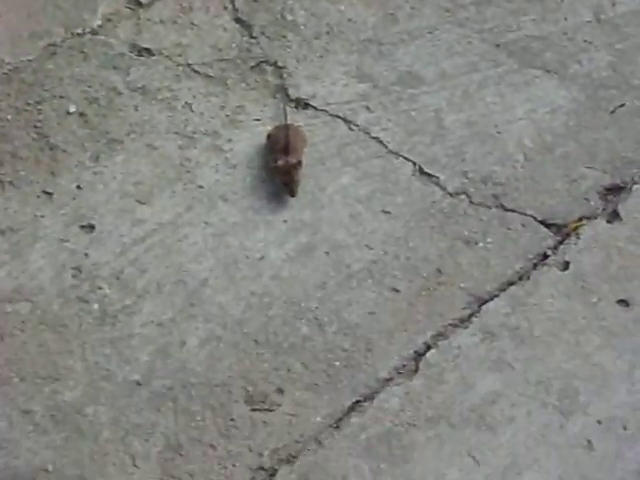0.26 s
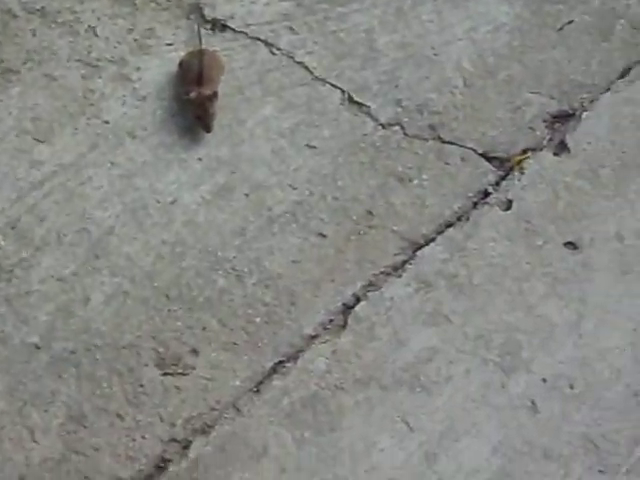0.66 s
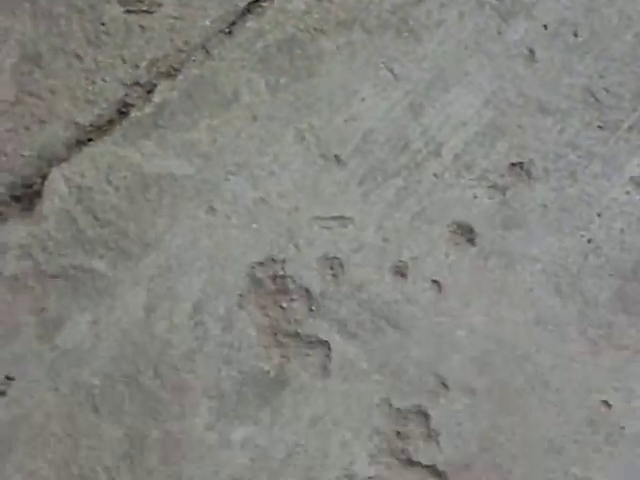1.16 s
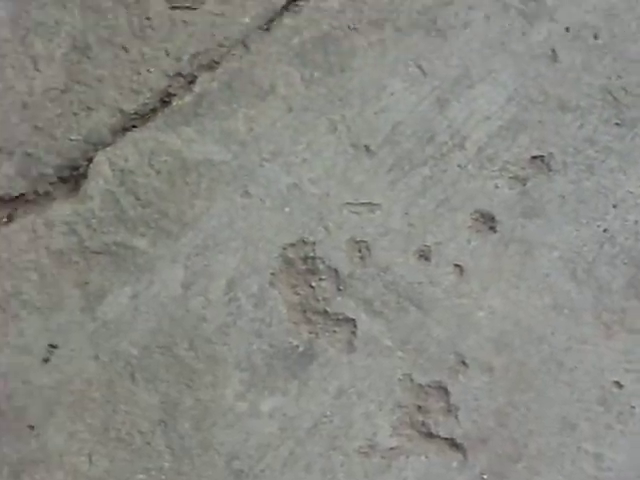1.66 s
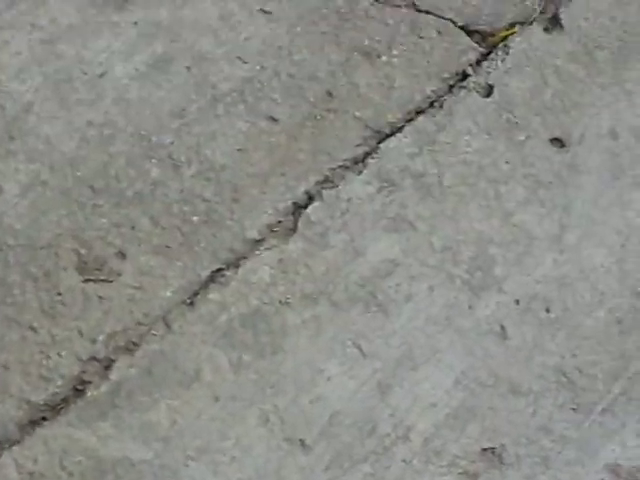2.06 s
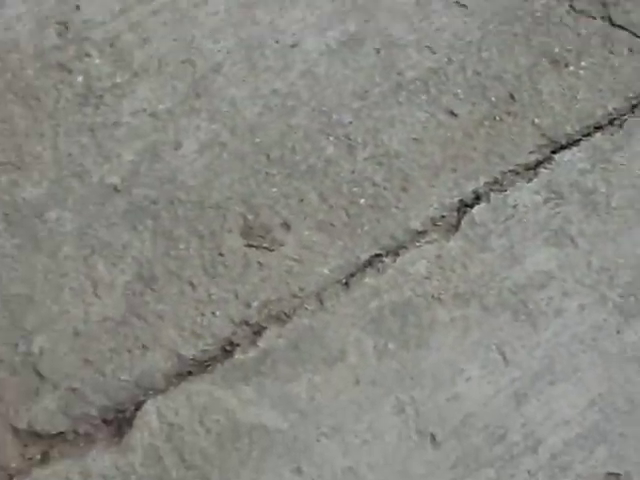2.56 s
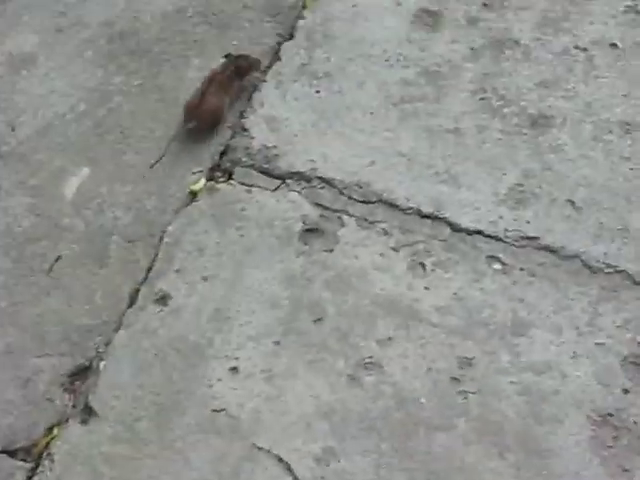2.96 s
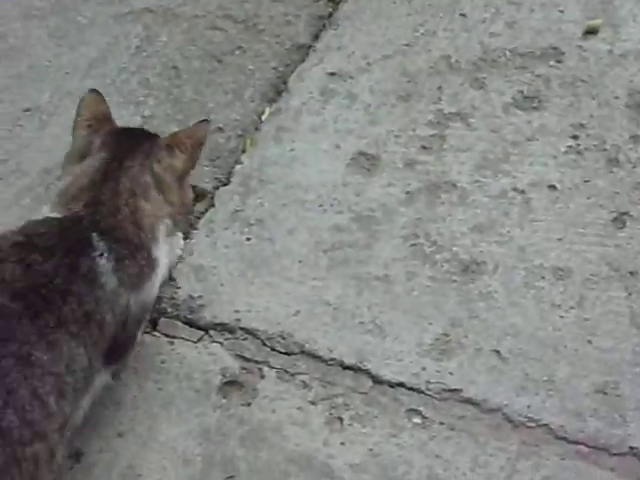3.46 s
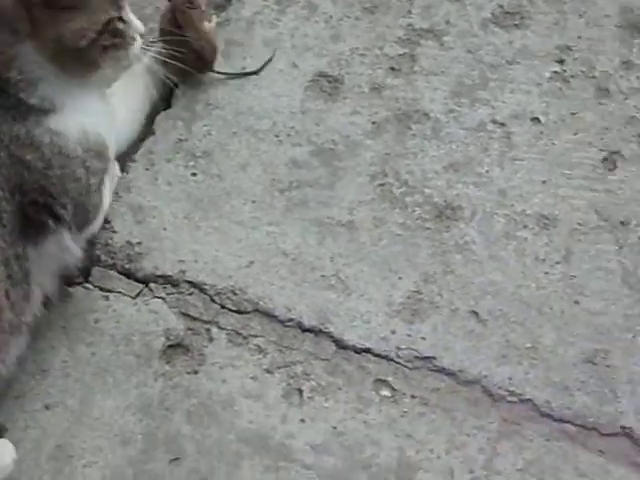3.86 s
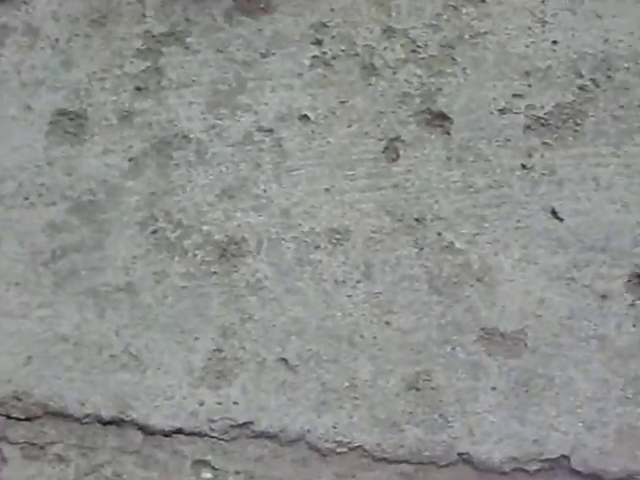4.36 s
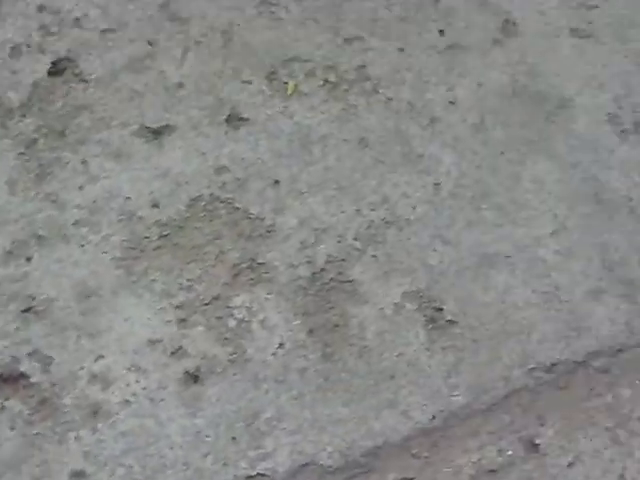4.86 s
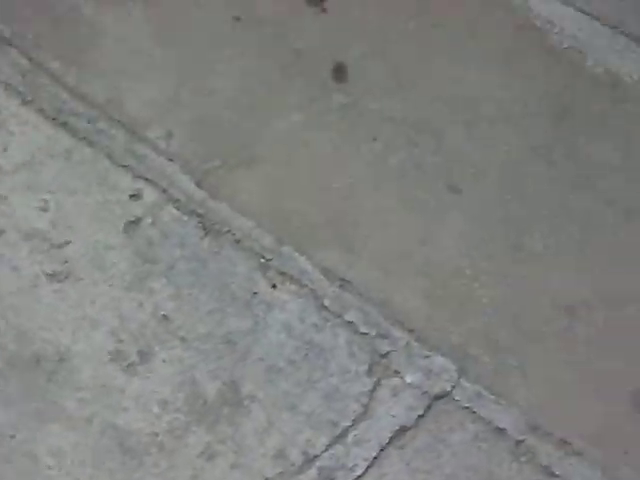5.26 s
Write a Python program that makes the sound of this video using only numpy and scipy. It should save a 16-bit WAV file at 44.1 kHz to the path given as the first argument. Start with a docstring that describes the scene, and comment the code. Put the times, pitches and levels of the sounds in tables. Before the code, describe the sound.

Sharp, uneven sandal steps on concrete, with small grit ticks, light scuffs, a short echo and a faint electrical hum.

```python
"""Sandals in a small yard

Someone in hard sandals takes a few quick steps over concrete, holding a camera.
Each heel taps, then the sole slaps down and the walls answer; soles scuff and grit ticks in between.
The camera hums at its frame rate, passes little treble and overloads on the loudest slaps."""
import sys
import numpy as np
from scipy import signal
from scipy.fft import rfft, irfft
from scipy.io import wavfile
from scipy.ndimage import uniform_filter1d

SR = 44100
rng = np.random.default_rng(int(sys.argv[2]) if len(sys.argv) > 2 else 0)


def file_out(sig):
    """Save sig as 16-bit WAV at sys.argv[1]."""
    # one column per channel
    cols = np.atleast_2d(sig).T
    # limit, then scale
    lim = np.clip(cols, -1, 1)
    pcm = np.round(lim * 32767).astype(np.int16)
    wavfile.write(sys.argv[1], SR, pcm)


N = 242991
TIME = np.arange(N) / SR
CONTACT_TIME = TIME[:1024]


def footsteps(thud_s=0.00097, hollow_s=0.00064, crack_s=0.00077, bite_s=0.00038, grit_s=0.0013):
    """The heel taps, the sole slaps, trapped air rings, grit crunches. Gives dry sound and echo send."""
    # The walk; weight deepens the thud, a cupped sole traps air and sounds hollow.
    # Each row: heel and slap times in seconds, heel and slap levels in dB, weight and cupping in dB,
    # thud, crack and bite pitches in Hz, echo send in dB.
    walk = [ (0.7312, 0.7473, -24, -8, 1, -16.5, 348, 1815, 5130, -3),
            (0.962, 0.9755, -18.5, -4, 0.5, -15.5, 309, 2057, 4420, -0.5),
            (2.0696, 2.0859, -19, -4.5, -6, -15, 280, 1853, 3900, -2),
            (2.179, 2.1856, -21, -26, 11, -4, 520, 2280, 3100, -16.5),
            (2.353, 2.366, -17.5, -4, 1.5, 3, 355, 2530, 4100, -2.5),
            (3.7932, 3.8066, -21, -4.5, -6.5, 2, 491, 1970, 2800, -3.5),
            (4.057, 4.0702, -14.5, -4, -8, 0, 336, 1856, 2420, -4),
            (4.3094, 4.322, -23.5, -13.5, -8, 4, 275, 1660, 3980, -8.5),
            (4.953, 4.9643, -43.5, -22, 1, 2.5, 394, 2280, 4310, -3.5), ]
    # The heel's resonances. Each row: pitch in Hz, level in dB relative to the tap.
    heel_modes = [(430, -3), (2100, -4), (4100, -4)]
    near, send = np.zeros((2, N))
    rises_s = (thud_s, crack_s, bite_s)
    heel = sum(amp(db) * ring(hz, rise) for (hz, db), rise in zip(heel_modes, rises_s))
    for heel_at, slap_at, heel_db, slap_db, weight_db, cup_db, thud_hz, crack_hz, bite_hz, yard_db in walk:
        thud = amp(weight_db - 3.5) * ring(thud_hz, thud_s)
        # a harder slap cracks more, a cupped sole less
        crack = amp(-1 + 0.42 * slap_db - 0.3 * cup_db) * ring(crack_hz, crack_s)
        bite = amp(3.5 - 5.5 * np.log2(bite_hz / crack_hz)) * ring(bite_hz, bite_s)
        hollow = ring(768 * (330 / thud_hz) ** 0.45, hollow_s)  # rings lower under a higher thud
        # the heel is turned away from the camera, so more of it arrives as echo
        tap = (heel_at, heel_db, heel, 0.27 * cup_db - 2, -0.5, yard_db + 5.5)
        slap = (slap_at, slap_db, thud + crack + bite, cup_db - 4.5, -3.5, yard_db)
        for start, db, body, hollow_db, grit_db, send_db in (tap, slap):
            air = amp(hollow_db) * hollow
            crunch = amp(grit_db) * grit(grit_s)
            add(near, start, amp(db) * (body + air + crunch))
            # the flat sole radiates mostly upward, so the walls receive more grit than ring
            add(send, start, amp(db + send_db) * (amp(-12) * body + amp(-2) * air + crunch))
        add(near, slap_at + 0.0022, amp(slap_db - 6) * grit(crack_s))  # the toe lands last, on more grit
    return np.array([near, send])


def pressure(rise_s):
    """The push of one contact: peaks at 1 after rise_s and lets go."""
    return CONTACT_TIME / rise_s * np.exp(1 - CONTACT_TIME / rise_s)


def ring(hz, rise_s):
    """A struck, heavily damped resonance."""
    return pressure(rise_s) * np.sin(2 * np.pi * hz * CONTACT_TIME)


def grit(rise_s):
    """Many grains crushed in one contact: a brief burst with an even, broad spectrum."""
    # The tone of the crunch. Each row: frequency in Hz, level in dB.
    crunch_colour = [(100, -14), (400, -6.5), (900, 1.5), (1350, -9.5), (1900, 0.5), (2500, -2.5),
                     (3300, -3.5), (4200, -5), (5200, -5), (6500, -5)]
    push = pressure(rise_s)
    spectrum = amp(curve_at(crunch_colour, np.fft.rfftfreq(len(push), 1 / SR)))
    burst = push * noise(crunch_colour, size=len(push))
    for _ in range(4):  # impose tone and envelope in turn, keeping the burst smooth and short
        phase = np.angle(rfft(burst))
        burst = irfft(spectrum * np.exp(1j * phase)) * np.sqrt(push)
    return unit_rms(burst) * np.sqrt(np.mean(push ** 2))


def grit_ticks(low_hz=460, body_hz=740, body_s=0.00069, snap_hz=2420, loose_per_s=4):
    """Grit clicks underfoot and fainter loose grains shift at random. Gives dry sound and echo send."""
    # Small dry clicks. Each row: start in seconds, level in dB, body in dB relative to that level.
    clicks = [ (1.5171, -29.5, 10), (1.5903, -24, -2), (2.2142, -15, -8), (2.28, -35.5, -13.5),
              (2.585, -39.5, 4.5), (2.7307, -34.5, 6), (2.8052, -46.5, 15.5), (2.8766, -46.5, 14),
              (3.1435, -39.5, 7.5), (3.1775, -51.5, 21), (3.5163, -32.5, 10.5), (3.532, -38.5, 9),
              (3.7076, -24.5, -19.5), (3.9212, -34, 8), (4.0308, -35, -11), ]
    near, send = np.zeros((2, N))
    chance = rng.random((round(loose_per_s * N / SR), 2))
    loose = [(when * N / SR, -54.5 + 6 * (2 * size - 1), 0) for when, size in chance]
    for start, db, body_db in clicks + loose:
        crunch = grit(rise_s=0.0006)
        body = amp(body_db) * (ring(low_hz, body_s) + ring(body_hz, body_s)) / 2
        snap = amp(2) * ring(snap_hz, rise_s=0.0004)
        add(near, start, amp(db) * (crunch + body + snap))
        add(send, start, amp(db) * (amp(-20.5) * crunch + amp(-8) * body))
    return np.array([near, send])


def scuffs(roughness_db=2, send_db=-9):
    """A sole slides over rough concrete, catching unevenly. Gives dry sound and echo send."""
    # The drags of the sole. Each row: centre in seconds, half length in seconds, level in dB.
    drags = [ (1.221, 0.017, -54.5), (2.749, 0.018, -45), (2.967, 0.012, -55), (3.101, 0.014, -49.5),
             (3.276, 0.0034, -47.5), (4.953, 0.007, -46), (5.312, 0.019, -35.5), ]
    # The tone of the scrape. Each row: frequency in Hz, level in dB.
    scrape_colour = [(150, -28.5), (700, -17), (1300, -14), (2000, 3.5), (3200, -9), (4500, 0),
                     (6000, -15.5)]
    strokes = sum(amp(db) * np.exp(-((TIME - centre) / half) ** 2) for centre, half, db in drags)
    catching = flicker(roughness_db, N, smooth_samples=90)
    scrape = strokes * unit_rms(catching * noise(scrape_colour))
    return np.array([scrape, amp(send_db) * scrape])


def yard_echo(send, reflections_per_s=4000, first_s=0.0055, wall_s=0.038, wall_db=3):
    """Scattered reflections swell once where the far wall answers; each band dies at its own speed."""
    # The yard's decay. Each row: frequency in Hz, seconds to fall by 60 dB.
    decay_times = [(100, 0.29), (400, 0.4), (900, 0.36), (2500, 0.37), (4000, 0.35), (6000, 0.31)]
    # The tone of the echo. Each row: frequency in Hz, level in dB.
    echo_colour = [(80, 12), (250, 4), (450, 6), (850, 1.5), (1400, 5.5), (1900, -1.5), (2600, 1),
                   (3800, 0.5), (5500, -5)]
    t = TIME[:SR]
    reflections = rng.choice([-1., 1.], SR) * (rng.random(SR) < reflections_per_s / SR)
    reflections *= flicker(2, SR, smooth_samples=130)
    hz, age_s, bands = signal.stft(reflections, SR, nperseg=256)
    fall_db = -60 * age_s / curve_at(decay_times, hz)[:, None]
    bands = bands * amp(fall_db + curve_at(echo_colour, hz)[:, None])
    tail = signal.istft(bands, SR)[1][:SR]
    onset = np.clip((t - first_s) / 0.00081, 0, 1)
    far_wall = amp(wall_db * np.exp(-((t - wall_s) / 0.0082) ** 2))
    return signal.oaconvolve(send, unit_rms(tail * onset * far_wall) / np.sqrt(SR))[:N]


def moving_echo(send, patterns=5, stride_s=0.3):
    """The walker moves on, so each stride meets the next of a few patterns of reflections."""
    pattern = TIME // stride_s % patterns
    return sum(yard_echo(send * (pattern == k)) for k in range(patterns))


def camera_hum(frame_hz=29.96, hiss_db=-53.5, puff_db=-49, tick_db=-49):
    """Once a frame the electronics draw current: a low buzz, a puff and two tiny ticks, over hiss."""
    # The buzz. Each row: multiple of the frame rate, rms level in dB.
    harmonics = [(1, -54), (2, -61.5), (3, -62), (4, -65), (5, -67.5), (6, -64.5), (7, -65.5), (8, -64.5),
                 (9, -69), (12, -73), (13, -78), (14, -69.5)]
    # The tone of the puffs. Each row: frequency in Hz, level in dB.
    puff_colour = [(30, -10), (100, -1.5), (250, 2.5), (450, 4), (900, -5), (1400, -11), (3000, -23.5)]
    # The tone of hiss and ticks. Each row: frequency in Hz, level in dB.
    hiss_colour = [(20, -0.5), (60, -0.5), (150, 2.5), (300, -10), (600, -6.5), (950, -6), (1400, -14.5),
                   (2500, -16), (4000, -21), (5500, -23.5)]
    cycles = frame_hz * TIME - 0.5
    buzz = np.zeros(N)
    for multiple, db in harmonics:
        offset = (multiple > 1) * rng.random() / 3
        buzz += amp(db) * np.sqrt(2) * np.sin(2 * np.pi * (multiple * cycles + offset))
    phase = (cycles + 0.5) % 1 - 0.5
    puffs = amp(puff_db) * np.exp(-(phase / 0.15) ** 4) * noise(puff_colour)
    hiss = amp(hiss_db) * noise(hiss_colour)
    switching = sum(np.exp(-((phase - at) / 0.023) ** 2) for at in (-0.3, -0.1))
    ticks = amp(tick_db) * switching * noise(hiss_colour)
    return buzz + puffs + hiss + ticks


def noise(colour, size=N):
    """Noise of rms 1, coloured by rows of Hz and dB."""
    gain = amp(curve_at(colour, np.fft.rfftfreq(size, 1 / SR)))
    return unit_rms(irfft(rfft(rng.standard_normal(size)) * gain, size))


def flicker(depth_db, size, smooth_samples):
    """A gain that wavers at random by depth_db rms."""
    return amp(depth_db * unit_rms(uniform_filter1d(rng.standard_normal(size), smooth_samples)))


def curve_at(points, hz):
    """Reads a curve on a log-frequency axis."""
    point_hz, value = np.transpose(points)
    return np.interp(np.log(hz + 1), np.log(point_hz + 1), value)


def amp(db):
    """Decibels to gain."""
    return 10 ** (np.asarray(db) / 20)


def unit_rms(x):
    """Scales to rms 1."""
    return x / np.sqrt(np.mean(x ** 2) + 1e-20)


def add(mix, start_s, sound):
    """Lays a sound into the mix at start_s."""
    part = mix[round(start_s * SR):][:len(sound)]
    part += sound[:len(part)]


def scene(low_cut_hz=130, echo_db=-6):
    """Footwork, its first bounces and the yard's echo reach a small microphone; the camera adds hum."""
    # Nearby surfaces throw each step back. Each row: delay in seconds, level in dB.
    bounces = [(.0025, -23), (.0068, -24)]
    steps_near, steps_send = steps = footsteps()
    near, send = steps + grit_ticks() + scuffs()
    air = near + amp(echo_db) * moving_echo(send)
    for delay, db in bounces:
        add(air, delay, amp(db) * steps_near)
    heard = signal.lfilter(*signal.butter(1, low_cut_hz, "high", fs=SR), air)
    return (heard + camera_hum())[None]


def record(dry, treble_hz=5620, ceiling=0.73, band_limit_hz=16600):
    """The microphone stage cuts the treble and overloads with a firm knee; a band limit follows."""
    treble_cut = signal.firwin(161, treble_hz, window=("kaiser", 7), fs=SR)
    band_limit = signal.firwin(511, band_limit_hz, window=("kaiser", 9), fs=SR)
    dull = signal.oaconvolve(dry, treble_cut[None], "same")
    clipped = dull / (1 + (dull / ceiling) ** 10) ** (1 / 10)
    return signal.oaconvolve(clipped, band_limit[None], "same")


dry = scene()
out = record(dry)
file_out(out)
```